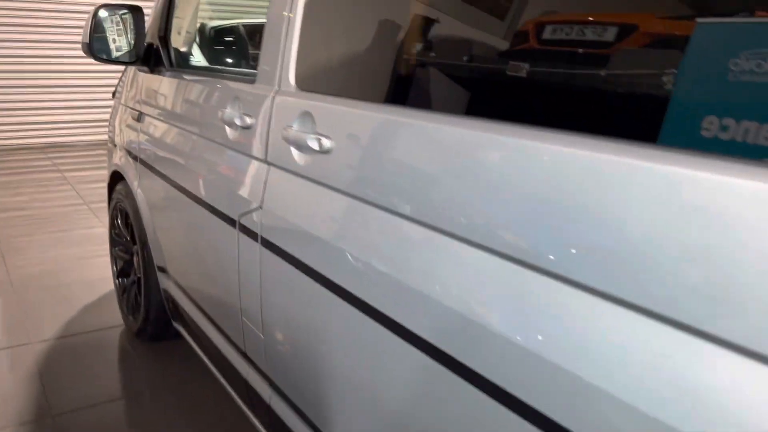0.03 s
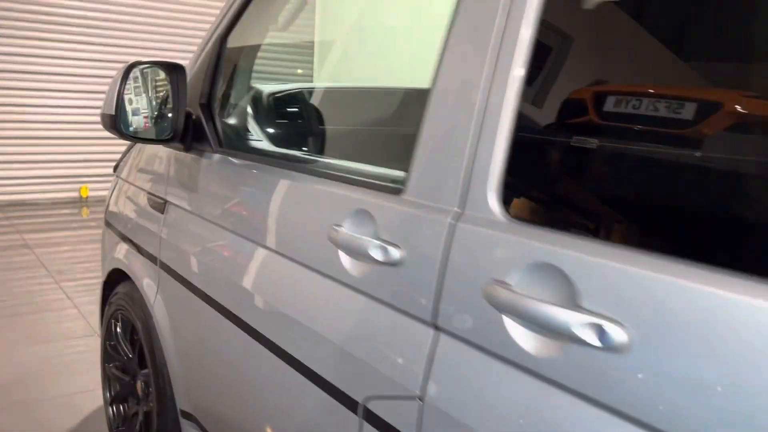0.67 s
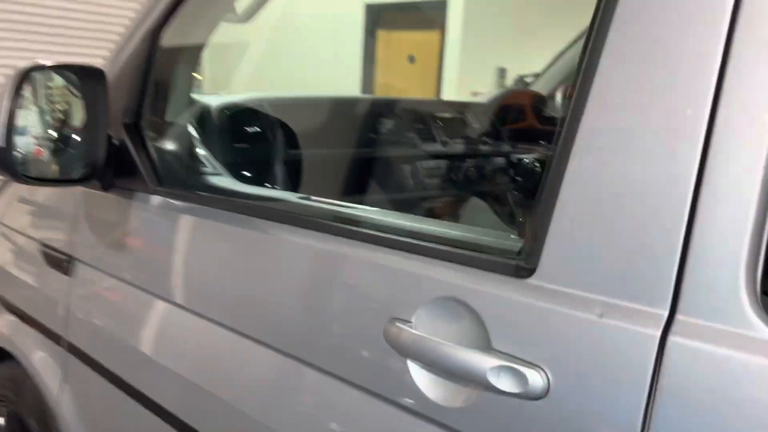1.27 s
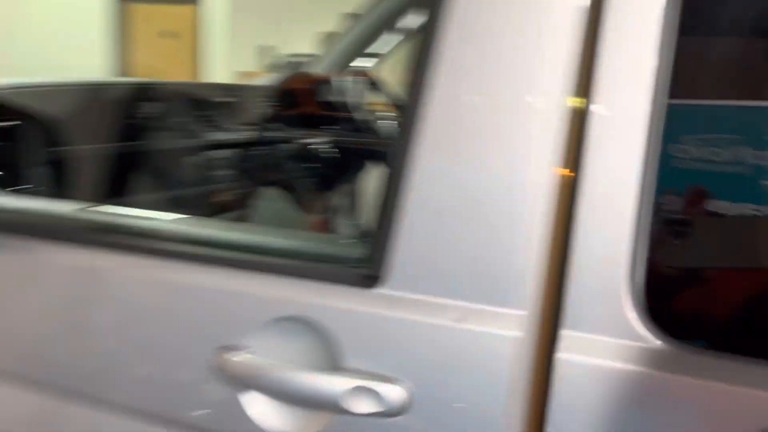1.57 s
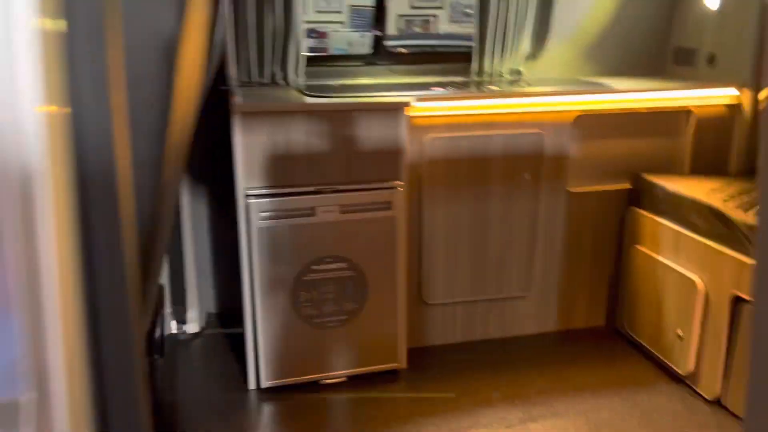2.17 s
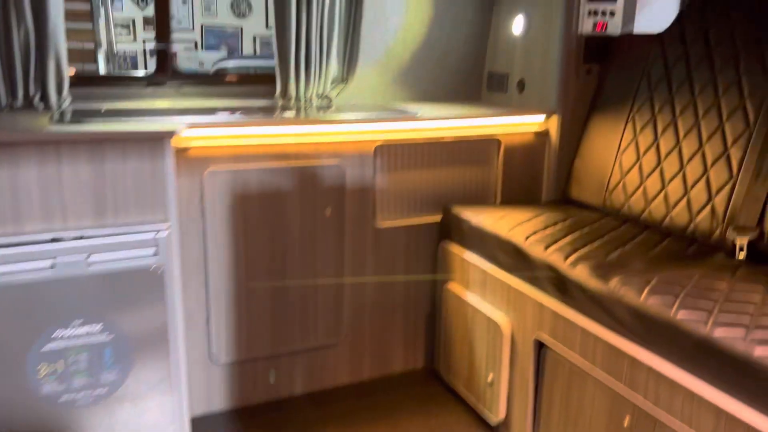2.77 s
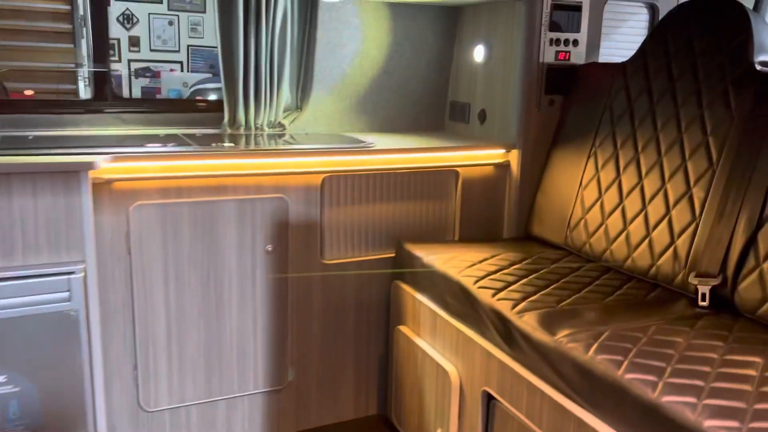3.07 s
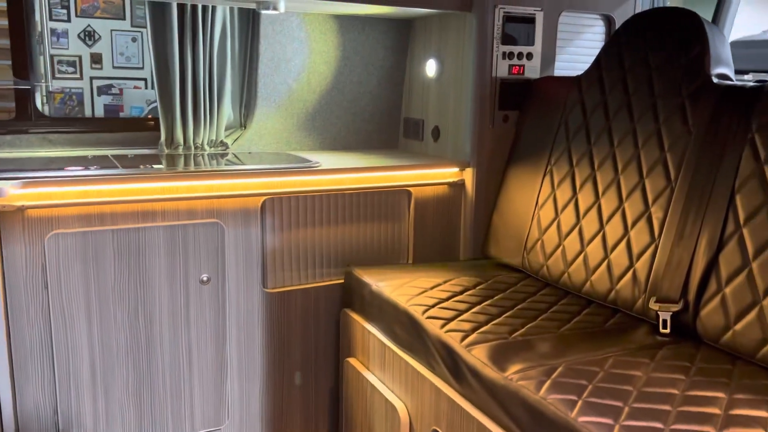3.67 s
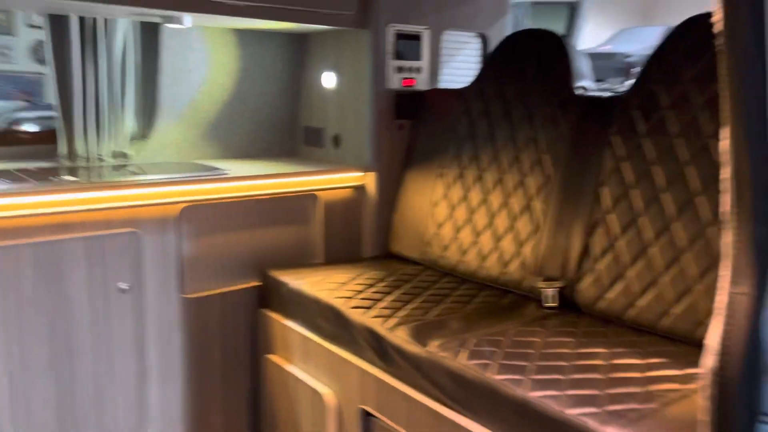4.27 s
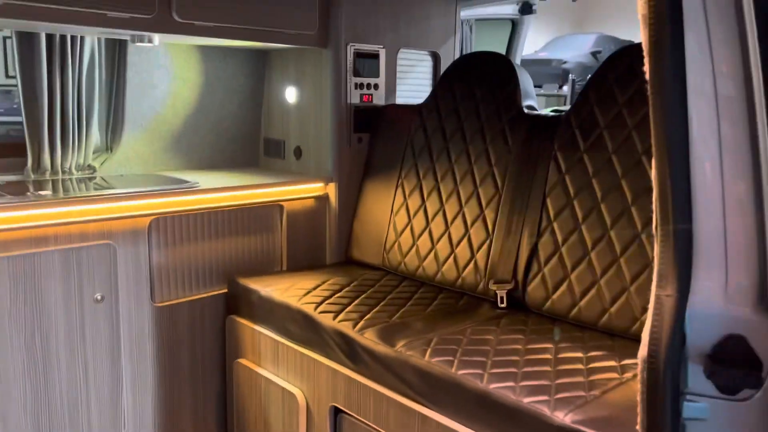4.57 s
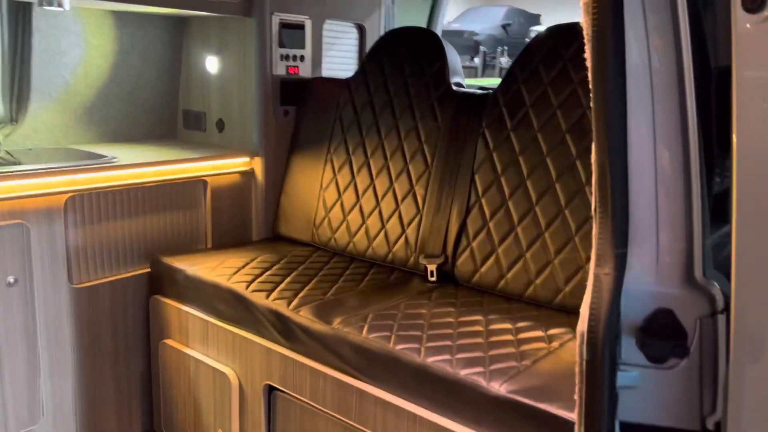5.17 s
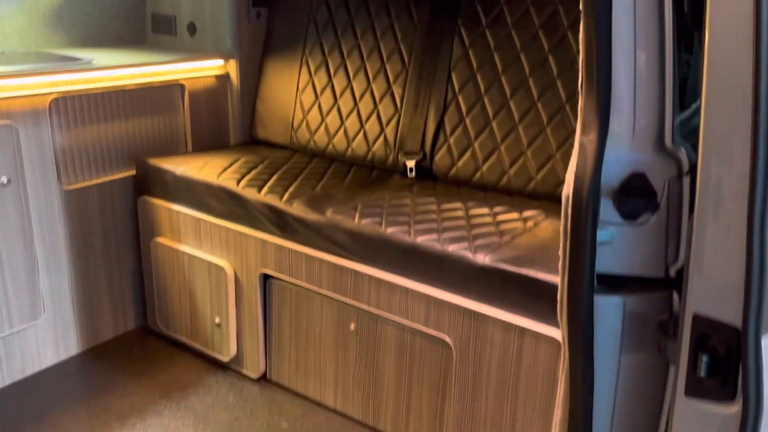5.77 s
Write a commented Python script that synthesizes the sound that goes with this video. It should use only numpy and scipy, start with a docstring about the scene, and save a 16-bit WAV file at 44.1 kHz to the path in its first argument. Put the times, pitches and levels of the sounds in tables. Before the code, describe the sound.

Heard close by in stereo, a van's side door unlatches with small clicks and one sharp, deep clunk. It rolls back with a rumble and a light metallic rasp, clacking on the way, and stops in a quick cluster of knocks. Soft shoe taps and swishing clothes come before and after, over the low hum of showroom ventilation.

```python
"""Van sliding door opening in a quiet showroom.

The handle clicks, the latch lets go with a clunk that booms in the cabin, and the door rumbles back
on its rollers along a steel runner, then knocks into its hold-open catch. Blows and rolling ring
the cabin air and door skin. Soft steps and swishing clothes come before and after; ventilation hums.
Stereo, heard from beside the door."""
import sys
import numpy as np
from scipy import signal
from scipy.io import wavfile

SR = 44100
rng = np.random.default_rng(int(sys.argv[2]) if len(sys.argv) > 2 else 0)


def master(y):
    """Save y as 16-bit WAV."""
    cut = np.clip(np.atleast_2d(y).T, -1, 1)
    pcm = np.round(cut * 32767)  # scale
    wavfile.write(sys.argv[1], SR, pcm.astype(np.int16))


N = 257103
TIME = np.arange(N) / SR
BAND_EDGES_HZ = 28 * 2 ** (np.arange(24) * .4)

# blows of handle, latch, runner joints, catch: t/s, level/dB, tilt/(dB/octave), cabin boom/dB
BLOWS = [(1.23, -42, -5, -65), (1.269, -36.5, -5, -52), (1.279, -30.5, -6, -35), (1.3337, -34, -6, -40),
         (1.387, -18.5, -3.5, -11), (1.5134, -34.5, -7.5, -26), (1.5606, -40, -0.5, -29),
         (1.846, -27.5, -4.5, -26), (2.1542, -33.5, -7.5, -44), (3.232, -36, -3.5, -52),
         (3.25, -35, -7.5, -24), (3.354, -33, -4.5, -47), (3.3693, -28, -4.5, -34), (3.462, -33, -4.5, -40),
         (3.469, -32, -7.5, -22), (3.491, -35, -6.5, -27.5), (3.505, -39, -9.5, -25),
         (3.559, -37.5, -6.5, -27)]
# door's response to a blow: f/Hz, gain/dB
BLOW_SPECTRUM = [(35, -20.5), (60, 0.5), (110, -11), (220, -5), (450, -8), (700, -2.5), (1300, -2.5),
                 (2100, -7), (3000, -3), (4300, -10.5), (7000, -0.5), (14000, -13.5)]
# cabin air and door skin: f/Hz, level/dB, t60/s
BODY_MODES = [(49.8, -16, 0.95), (125, -14, 0.32), (168, -12.5, 0.35), (216.8, -10.5, 0.68),
              (239.6, -11.5, 0.34), (283, -11.5, 0.4), (342.3, -13.5, 0.71), (401.3, -11.5, 0.24),
              (476.3, -8.5, 0.26), (673.5, -9.5, 0.12), (1484, -11, 0.19)]
# blows that bend a panel: t/s, level/dB, first f/Hz, last f/Hz, length/s
PANEL_BENDS = [(1.3872, -8, 1690, 150, 0.012), (1.513, -17.5, 1000, 630, 0.0053),
               (2.1507, -28, 1530, 604, 0.0063), (3.2325, -25, 980, 850, 0.0088),
               (3.3736, -15, 610, 306, 0.012), (3.406, -17.5, 200, 150, 0.012),
               (3.467, -14.5, 604, 450, 0.011), (4.748, -39.5, 2330, 670, 0.0044)]
# latch and rollers striking steel: t/s, level/dB
STEEL_HITS = [(1.388, -18), (1.8472, -20.5), (2.1535, -28.5), (3.3723, -43), (3.4915, -34)]
# roller carriage: f/Hz, level/dB, t60/s
CARRIAGE_MODES = [(1230, -4.5, 0.075), (1442, 1.5, 0.041), (2160, -13, 0.055), (3170, -16, 0.05),
                  (4330, -12.5, 0.02), (5470, -13, 0.015)]
# fittings ticking, then the hold-open catch: t/s, level/dB
FITTING_SNAPS = [(1.387, -28), (1.759, -45.5), (1.957, -49), (3.241, -43), (3.3532, -35), (3.368, -30.5),
                 (3.462, -39.5)]
# steel fittings and catch: f/Hz, level/dB, t60/s
FITTING_MODES = [(8440, 10, 0.0056), (10820, 5, 0.0048), (15400, -4, 0.008)]
# how hard the rollers run: t/s, level/dB
ROLL_EFFORT = [(1.5, -36), (1.72, -27.5), (2.3, -30.5), (2.56, -26.5), (2.88, -26.5), (3.15, -32.5),
               (3.5, -34.5)]
# rolling at full speed: f/Hz, level/dB
ROLL_SPECTRUM = [(35, -61), (60, -49), (120, -35), (200, -35.5), (290, -31), (410, -33.5), (620, -42.5),
                 (1250, -45.5), (2100, -53.5), (3000, -57.5), (4600, -67), (8500, -66.5), (13000, -87.5)]
# steel runner: f/Hz, level/dB, t60/s
RAIL_MODES = [(738, -1.5, 0.08), (907, 3.5, 0.07), (1198, -3, 0.13), (1596, -4.5, 0.13), (2105, -5.5, 0.16)]
# friction at runner bend, rail and catch, and dull thumps after the latch and stops: t/s, length/s, level/dB,
# centre f/Hz, width/octaves
DOOR_RUBS = [(1.39, 0.19, -24.5, 175, 1), (1.74, 0.27, -42.5, 1370, 0.64), (2.88, 0.27, -31, 149, 0.4),
             (3.0, 0.25, -64, 7760, 0.56), (3.231, 0.082, -28, 468, 0.5), (3.365, 0.069, -27, 266, 0.78),
             (3.46, 0.265, -37.5, 324, 0.34), (3.47, 0.12, -43.5, 1000, 0.78)]
# van rocking on its springs as the door stops: t/s, length/s, level/dB
BODY_SWAYS = [(3.295, 0.62, -33.5)]
# rollers on stretches of the runner: t/s, length/s, first f/Hz, last f/Hz, level/dB
ROLLER_WHIRRS = [(1.853, 0.57, 1940, 1863, -52.5), (2.55, 0.37, 1477, 1400, -48),
                 (2.786, 0.456, 1204, 1154, -46)]
# steps and small ticks: t/s, level/dB, tilt/(dB/octave)
SHOE_TAPS = [(0.174, -53.5, -1), (0.503, -48.5, -1.5), (1.0425, -41.5, -4.5), (4.243, -58.5, -3),
             (4.748, -46.5, -3), (5.2005, -50.5, -7)]
# ring of a tap: f/Hz, level/dB, t60/s
SHOE_MODES = [(740, -2, 0.024), (1310, 5, 0.022), (1670, 6, 0.014)]
# clothes and soles brushing: t/s, length/s, level at 1 kHz/dB, level at 8 kHz/dB
CLOTH_SWISHES = [(0, 0.21, -63, -68), (0.252, 0.063, -59, -53.5), (0.75, 0.67, -64, -66.5),
                 (4.23, 0.21, -53.5, -73), (4.341, 0.15, -56.5, -55.5), (4.347, 1.5, -59, -75),
                 (4.754, 0.25, -58.5, -60.5), (4.96, 0.084, -57.5, -59)]
# tone of shoes and cloth: f/Hz, gain/dB
WALKER_SPECTRUM = [(60, -12), (280, -7.5), (900, 3.5), (3800, -1.5), (8600, 3), (13000, -34)]
# cloth and soles squeaking: t/s, length/s, f/Hz, width/Hz, level/dB
WALKER_SQUEAKS = [(4.24, 0.16, 8550, 1690, -58.5), (4.364, 0.049, 2850, 301, -61),
                  (5.483, 0.27, 5380, 4110, -64)]
# ventilation rush per band: f/Hz, level/dB
VENT_SPECTRUM = [(35, -79), (60, -52), (90, -59.5), (130, -62.5), (220, -72), (330, -63.5), (480, -74),
                 (700, -62), (1000, -64.5), (1900, -68), (3000, -77), (4500, -78.5), (8500, -82.5),
                 (13000, -107)]
# fan tones: f/Hz, level/dB
FAN_TONES = [(323.0, -65), (436.0, -69), (651.4, -64)]
# left-right likeness of the door: f/Hz, correlation
DOOR_CORRELATION = [(60, 0.96), (250, 0.85), (600, 0.4), (1100, 0.3), (1600, -0.47), (2400, 0.1),
                    (4500, 0.3), (8500, 0.4), (11000, -.7), (14500, 0.8)]
# left-right likeness of walker and ventilation: f/Hz, correlation
ROOM_CORRELATION = [(60, 0.98), (300, 0.4), (650, 0.12), (1400, 0.046), (7000, 0.16)]
# door's stereo balance: f/Hz, left minus right/dB
DOOR_BALANCE = [(60, -0.5), (250, -3.5), (900, -1), (1700, 3.5), (3000, 1.5), (6000, 6.5), (9000, -1.5)]

BOOM_HZ, PANEL_HZ = 63.6, 280   # crossover from cabin boom to door panel


def knocks(crack_t60_s=0.07, crack_cycles=2, rise_s=0.0006, rise_cycles=0.485,
           cabin_db=-11.5, cabin_t60_s=0.39, cabin_cutoff_hz=9500):
    """Each blow is a chattering crack, slower in the bass, then a duller wash from the cabin."""
    out, chatter = 0, flutter(0.5, 350)
    for hz, noise in bands(DOOR_CORRELATION):
        energy = clicks(BLOWS, from_db(blow_db(hz) + at_hz(BLOW_SPECTRUM, hz)) ** 2)
        crack = chatter ** 2 * fade(energy, crack_t60_s + crack_cycles / hz)
        wash = from_db(cabin_db) ** 2 * swell(fade(energy, cabin_t60_s), 0.0026)
        wash /= 1 + (hz / cabin_cutoff_hz) ** 4
        out += panned(noise, hz) * swell(np.sqrt(crack + wash), rise_s + rise_cycles / hz)
    return out


def blow_db(hz):
    """Each blow's level at hz: cabin boom in the bass, panel and steel above."""
    panel_share = np.clip(np.log(hz / BOOM_HZ) / np.log(PANEL_HZ / BOOM_HZ), 0, 1)
    boom_db = np.array([row[3] for row in BLOWS])
    return panel_share * tilted_db(BLOWS, max(hz, PANEL_HZ)) + (1 - panel_share) * boom_db


def door_ring(gain_db=-2.5, scatter_db=4.5):
    """Every blow rings the cabin air and door skin, each time a little differently."""
    out = 0
    for hz, mode_db, t60_s in BODY_MODES:
        sizes = from_db(blow_db(hz) + mode_db + gain_db + scatter_db * rng.standard_normal(len(BLOWS)))
        mid = ring(clicks(BLOWS, sizes), hz, t60_s)
        side = ring(clicks(BLOWS, sizes * rng.choice([-1, 1], len(BLOWS))), hz, t60_s)
        out += door_stereo(mid, side, hz)
    return out


def clunks(glide_share=0.2):
    """A bending wave crosses a panel, highs first; the longer the blow, the slower the pitch falls."""
    out = 0
    for start_s, db, first_hz, last_hz, length_s in PANEL_BENDS:
        t = np.clip(TIME - start_s, 0, 2 * length_s)
        glide_s = glide_share * length_s
        cycles = last_hz * t + (first_hz - last_hz) * glide_s * (1 - np.exp(-t / glide_s))
        envelope = (1 - np.exp(-t * first_hz)) * np.exp(-(t / length_s) ** 6)
        out += panned(from_db(db) * envelope * np.sin(2 * np.pi * cycles), last_hz)
    return out / flutter(2.5, 200)


def clacks(scatter_db=3):
    """Hard steel contacts ring the roller carriage, each a little differently."""
    out, hit_db = 0, np.array([db for _, db in STEEL_HITS])
    for hz, mode_db, t60_s in CARRIAGE_MODES:
        sizes = from_db(hit_db + mode_db - scatter_db * rng.standard_normal(len(STEEL_HITS)))
        mid = ring(clicks(STEEL_HITS, sizes), hz, t60_s)
        side = np.roll(mid, int(SR / hz / 4))   # quarter cycle late
        out += door_stereo(mid, side, hz)
    return out


def catch(chatter_t60_s=0.033):
    """Fittings and catch chatter briefly, steel on steel, and ring brightly."""
    energy = clicks(FITTING_SNAPS, from_db([db for _, db in FITTING_SNAPS]) ** 2)
    envelope = np.sqrt(swell(fade(energy, chatter_t60_s), .001))
    decay_samples = chatter_t60_s * SR / np.log(1e6)
    force = envelope * rng.standard_normal((2, N)) / np.sqrt(decay_samples)
    return sum(from_db(db) * stereo(*ring(force, hz, t60_s), at_hz(DOOR_CORRELATION, hz))
               for hz, db, t60_s in FITTING_MODES)


def rolling(effort_db, gain_db=-1, modes_db=6.5, grit_above_hz=600):
    """Rollers judder over the runner's bumps and grit and keep the door's modes humming."""
    bumps, grit = flutter(0.7, 60), flutter(0.95, 490)
    out = 0
    for hz, noise in bands(DOOR_CORRELATION):
        texture = flutter(2, 14) * (grit if hz > grit_above_hz else 1)
        out += panned(noise, hz) * roll_gain(effort_db, hz) * texture
    shaking = rng.standard_normal((2, N))
    for hz, mode_db, t60_s in BODY_MODES:
        mid, side = unit_rms(wandering(ring(shaking, hz, t60_s)))
        out += door_stereo(mid, side, hz) * roll_gain(effort_db, hz) * from_db(mode_db + modes_db)
    return from_db(gain_db) * out * bumps


def roller_effort_db(full_speed_db=-26, ease_db_per_s=86):
    """Roller effort relative to full speed, falling away at both ends of the travel."""
    times_s, db = np.transpose(ROLL_EFFORT)
    outside_s = np.abs(TIME - np.clip(TIME, times_s[0], times_s[-1]))
    return np.interp(TIME, times_s, db) - full_speed_db - ease_db_per_s * outside_s


def roll_gain(effort_db, hz, rumble_hz=301.3, grit_hz=1200, grit_db_per_db=1.76):
    """Rolling strength at hz: faster is louder and brighter."""
    slope = at_hz([(rumble_hz, 1), (grit_hz, grit_db_per_db)], hz)
    return from_db(at_hz(ROLL_SPECTRUM, hz) + effort_db * slope)


def wandering(x, pitch_share=0.012):
    """A resonance strays in pitch as the load on the door shifts."""
    samples = np.arange(N)
    position = samples + np.cumsum(pitch_share * drift(9))
    return np.array([np.interp(position % N, samples, channel) for channel in x])


def runner(effort_db, gain_db=-4.5):
    """Rollers rasp on the steel runner, favouring now one mode, now another."""
    out, rasp = 0, rng.standard_normal((2, N))
    for hz, mode_db, t60_s in RAIL_MODES:
        gain = roll_gain(effort_db, hz) * from_db(gain_db + mode_db) * flutter(3.5, 7)
        mid, side = gain * unit_rms(wandering(ring(rasp, hz, t60_s)))
        out += door_stereo(mid, side, hz)
    return out


def rubs_and_sways(sway_hz=59.6, sway_octaves=0.85):
    """Friction strokes, dull thumps and the body's low rocking, each a bell-shaped band of noise."""
    rows = list(DOOR_RUBS) + [(*row, sway_hz, sway_octaves) for row in BODY_SWAYS]
    strokes = np.array([from_db(db) * stroke(start_s, length_s) for start_s, length_s, db, _, _ in rows])
    centres_hz, octaves = np.transpose(rows)[3:]
    out = 0
    for hz, noise in bands(DOOR_CORRELATION):
        weights = np.exp(-.5 * (np.log2(hz / centres_hz) / octaves) ** 2)
        out += panned(noise, hz) * (weights @ strokes)
    return out * flutter(1.5, 120)


def whirrs(width_hz=240):
    """Rough narrow bands sink as the rollers slow."""
    out = np.zeros((2, N))
    for start_s, length_s, first_hz, last_hz, db in ROLLER_WHIRRS:
        progress = np.clip((TIME - start_s) / length_s, 0, 1)
        phase = 2 * np.pi * np.cumsum(first_hz + (last_hz - first_hz) * progress) / SR
        for channel in out:
            channel += from_db(db) * np.sin(np.pi * progress) * rough_tone(phase, width_hz)
    return out


def walker(tap_t60_s=0.017, tap_cycles=6.2, hall_db=-13.5, hall_t60_s=0.38, swish_db=-9.5):
    """Shoes tap on tiles and echo in the hall; cloth and soles swish unevenly."""
    out, scuff = 0, flutter(2, 220)
    strokes = np.array([scuff * stroke(start_s, length_s) for start_s, length_s, _, _ in CLOTH_SWISHES])
    for hz, noise in bands(ROOM_CORRELATION):
        energy = clicks(SHOE_TAPS, from_db(tilted_db(SHOE_TAPS, max(hz, PANEL_HZ))) ** 2)
        taps = swell(fade(energy, tap_t60_s + tap_cycles / hz), 0.43 / hz)
        hall = from_db(hall_db) ** 2 * swell(fade(energy, hall_t60_s), 0.006)
        cloth_db = np.array([at_hz([(1000, low), (8000, high)], hz) for _, _, low, high in CLOTH_SWISHES])
        swishes = from_db(cloth_db + swish_db) ** 2 @ strokes ** 2
        out += noise * np.sqrt(taps + hall + swishes) * from_db(at_hz(WALKER_SPECTRUM, hz))
    return out


def tap_ring():
    """Each tap leaves a short hollow ring."""
    out = 0
    for k, (hz, db, t60_s) in enumerate(SHOE_MODES):
        force = clicks(SHOE_TAPS, from_db(tilted_db(SHOE_TAPS, hz) + db))
        out += (-1) ** k * ring(force, hz, t60_s)
    return out


def squeaks():
    """Cloth and soles stick and slip, giving faint noisy tones."""
    out = np.zeros((2, N))
    for start_s, length_s, hz, width_hz, db in WALKER_SQUEAKS:
        for channel in out:
            channel += from_db(db) * stroke(start_s, length_s) * rough_tone(2 * np.pi * hz * TIME, width_hz)
    return out


def ventilation(air_db=0.5, hum_db=-2.5, hum_width_hz=28, lean_in_s=(1.7, 3), shade_db=-2):
    """Rushing air and blurred fan tones, softer once the listener leans into the van."""
    rush = sum(noise * from_db(at_hz(VENT_SPECTRUM, hz) + air_db)
               for hz, noise in bands(ROOM_CORRELATION))
    hum = sum(from_db(db + hum_db) * rough_tone(2 * np.pi * hz * TIME, hum_width_hz)
              for hz, db in FAN_TONES)
    return (rush + hum) * from_db(np.interp(TIME, lean_in_s, [0, shade_db]))


def from_db(db):
    """Decibels to gain."""
    return 10 ** (np.asarray(db) / 20)


def unit_rms(x):
    """Scale to rms 1."""
    return x / np.sqrt(np.mean(x ** 2) + 1e-20)


def at_hz(points, hz):
    """Interpolate (f/Hz, value) rows on a log-frequency axis."""
    f, value = np.transpose(points)
    return np.interp(np.log(hz), np.log(f), value)


def tilted_db(rows, hz, pivot_hz=1000):
    """Each contact's level at hz: harder ones are brighter."""
    return np.array([row[1] + row[2] * np.log2(hz / pivot_hz) for row in rows])


def stereo(mid, side, correlation):
    """Left and right with a given correlation."""
    spread = np.sqrt(1 - correlation) * side * np.array([[1], [-1]])
    return (np.sqrt(1 + correlation) * mid + spread) / np.sqrt(2)


def panned(x, hz):
    """Apply the door's left-right balance at hz."""
    return x * from_db(at_hz(DOOR_BALANCE, hz) * np.array([[.5], [-.5]]))


def door_stereo(mid, side, hz):
    """Left and right with the door's correlation and balance."""
    return panned(stereo(mid, side, at_hz(DOOR_CORRELATION, hz)), hz)


def bands(correlations):
    """Yield (centre f/Hz, stereo noise of rms 1) per band."""
    white = rng.standard_normal((2, 2, N))
    for k, (low_hz, high_hz) in enumerate(zip(BAND_EDGES_HZ, BAND_EDGES_HZ[1:])):
        bandpass = signal.butter(2, [low_hz, high_hz], "band", fs=SR, output="sos")
        mid, side = unit_rms(signal.sosfilt(bandpass, white[k % 2]))
        hz = np.sqrt(low_hz * high_hz)
        yield hz, stereo(mid, side, at_hz(correlations, hz))


def drift(rate_hz):
    """Random wavering, rms 1."""
    knots = rng.standard_normal(int(N / SR * rate_hz) + 2)
    return unit_rms(np.interp(TIME * rate_hz, np.arange(len(knots)), knots))


def flutter(depth_db, rate_hz):
    """Randomly wavering gain."""
    return from_db(depth_db * drift(rate_hz))


def rough_tone(phase, width_hz):
    """Narrow noise around a running phase, rms 1."""
    return drift(width_hz) * np.sin(phase) + drift(width_hz) * np.cos(phase)


def clicks(rows, sizes):
    """One impulse at each row's time."""
    out = np.zeros(N)
    out[[int(row[0] * SR) for row in rows]] = sizes
    return out


def stroke(start_s, length_s):
    """Envelope that rises fast and trails off."""
    out, span = np.zeros(N), slice(int(start_s * SR), int((start_s + length_s) * SR))
    out[span] = np.sin(np.pi * np.linspace(0, 1, len(out[span])) ** .6) ** 2
    return out


def fade(power, t60_s):
    """Exponential energy decay."""
    return signal.lfilter([1], [1, -from_db(-120 / (t60_s * SR))], power + 1e-24)


def swell(envelope, rise_s):
    """One-pole smoothing of an onset."""
    r = np.exp(-1 / (rise_s * SR))
    return signal.lfilter([1 - r], [1, -r], envelope)


def ring(force, hz, t60_s):
    """Resonator: a unit click starts a decaying sine of height 1."""
    r, w = from_db(-60 / (t60_s * SR)), 2 * np.pi * hz / SR
    return signal.lfilter([0, np.sin(w)], [1, -2 * r * np.cos(w), r * r], force + 1e-18)


def scene():
    """Door, person beside it, showroom air."""
    effort_db = roller_effort_db()
    blows = knocks() + door_ring() + clunks() + clacks() + catch()
    slide = rolling(effort_db) + runner(effort_db) + rubs_and_sways() + whirrs()
    return blows + slide + walker() + tap_ring() + squeaks() + ventilation()


def record(dry, low_cut_hz=33, high_cut_hz=16000):
    """A small microphone loses the deepest bass; peaks are rounded and the top is cut."""
    thin = signal.sosfilt(signal.butter(4, low_cut_hz, "high", fs=SR, output="sos"), dry)
    rounded = thin / (1 + np.abs(thin) ** 6) ** (1 / 6)
    return signal.sosfilt(signal.ellip(10, .1, 80, high_cut_hz, fs=SR, output="sos"), rounded)


dry = scene()
out = record(dry)
master(out)
```